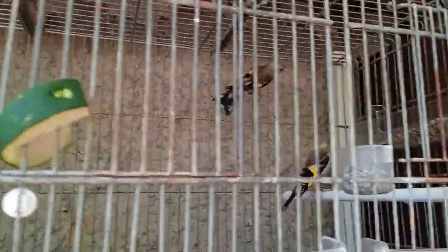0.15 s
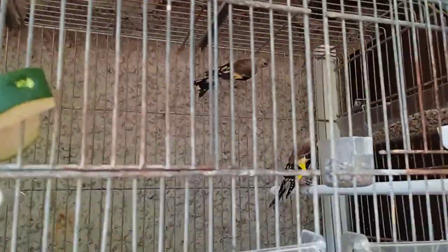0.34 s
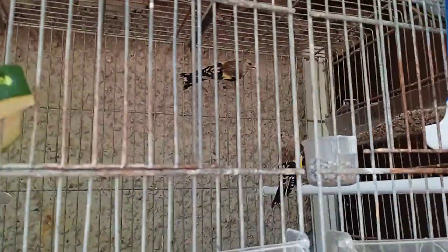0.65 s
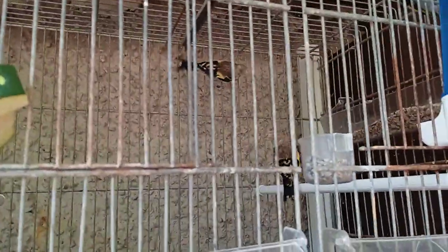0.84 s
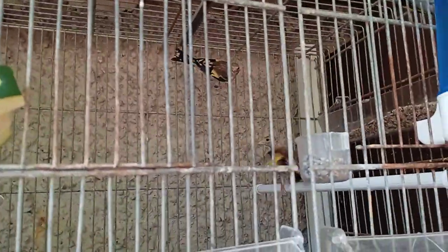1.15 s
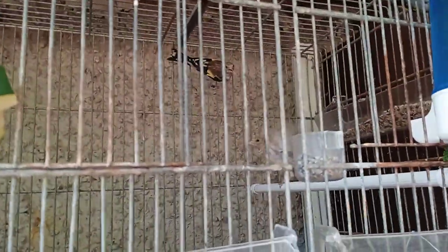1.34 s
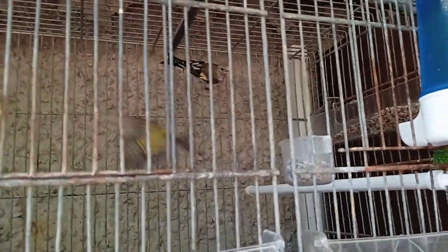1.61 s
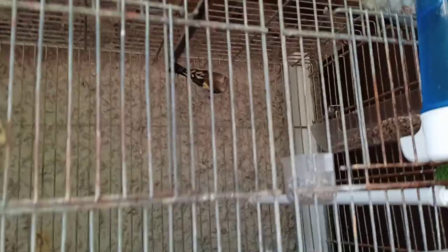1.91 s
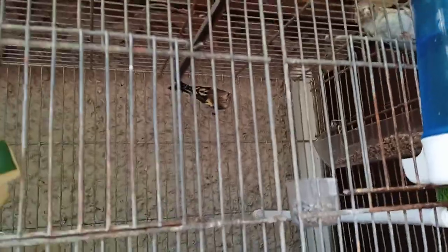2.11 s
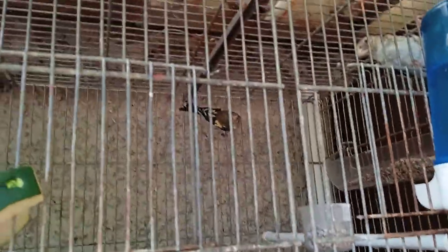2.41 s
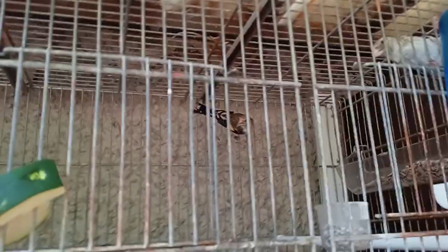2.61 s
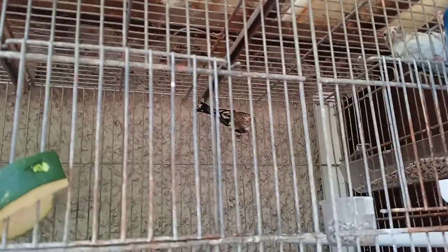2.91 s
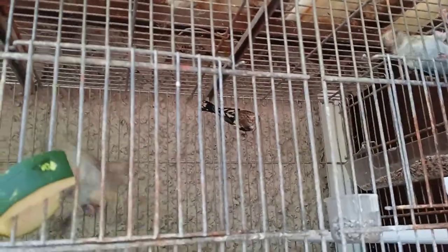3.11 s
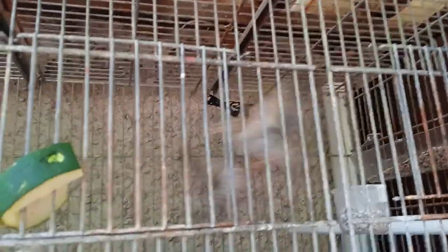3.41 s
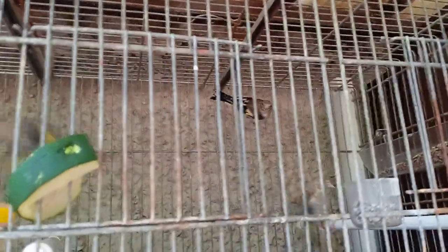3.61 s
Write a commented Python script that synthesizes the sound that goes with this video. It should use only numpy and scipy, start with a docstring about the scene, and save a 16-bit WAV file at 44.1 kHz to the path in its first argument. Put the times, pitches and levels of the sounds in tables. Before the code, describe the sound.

Young goldfinches beg with rising, raspy whistles amid chirps, wing flutters and cage wire ticks.

```python
"""Young goldfinches beg in a wire cage, with rising whines that start raspy and clear to a whistle.
A bird's voice organ (the syrinx) has two sides, so each whine is two voices that mix into extra tones.
Other birds add short chirps, wingbeats push puffs of air, and feet tick and knock on the wires.
The cage stands in a small room with a faint, steady hiss."""
import sys
import numpy as np
from scipy import signal
from scipy.fft import rfft, irfft, next_fast_len
from scipy.io import wavfile

SR = 44100
rng = np.random.default_rng(int(sys.argv[2]) if len(sys.argv) > 2 else 0)


def master(y):
    """Save y as 16-bit WAV."""
    cut = np.clip(np.atleast_2d(y).T, -1, 1)
    pcm = np.round(cut * 32767)  # scale
    wavfile.write(sys.argv[1], SR, pcm.astype(np.int16))


N = 165375

# The tone colours of the noises. Each row: frequency in Hz, relative level in dB.
HISS_COLOUR = [(25,-12.5),(85,3),(300,-12),(1000,-15),(1650,-9.5),(2450,-22),(3200,-7),(4500,-21),(5900,0.5),(7200,-7),(9000,-20),(13300,-40),(15500,-15)]
PUFF_COLOUR = [(35,-23),(85,1),(250,-2.5),(480,-6.5),(1100,-30.5)]
SWISH_COLOUR = [(200,-32),(550,2),(1000,-2.5),(1700,1),(2600,-10.5),(7000,-9.5),(11500,-25)]
TICK_COLOUR = [(100,4),(700,4.5),(1800,6),(2800,-2.5),(7000,-4),(12500,-20.5),(15500,-8)]
RATTLE_COLOUR = [(150,-27),(700,1.5),(1300,-5),(1850,0.5),(2200,-14),(8000,-24.5)]
# How the wing flutter swells and fades. Each row: time in seconds, level in dB.
WING_LEVELS = [(0,-64.5),(.07,-65.5),(.2,-85.5),(.43,-73.5),(.6,-101),(1.598,-78),(1.678,-63.5),(1.92,-69),(2.04,-75.5),(2.236,-61.5),(2.34,-69),(3.15,-74.5),(3.44,-64),(3.485,-58),(3.54,-61),(3.75,-68.5)]
# Feet and wing tips hit the wires. Each row: start in seconds, level in dB, treble tilt in dB per octave.
TICKS = [(0.01,-50,2.5),(0.376,-44,5.5),(1.128,-55,15),(1.67,-53,6),(1.759,-51,0),(1.797,-52.5,0),
         (1.836,-51.5,-1.5),(2.103,-55,-2.5),(2.227,-45.5,2),(2.284,-53,1.5),(3.581,-52.5,4.5)]
# Knocks on the cage. Each row: start in seconds, level in dB.
KNOCKS = [(.043,-53.5),(0.062,-49)]
# The cage's ringing notes. Each row: pitch in Hz, relative level in dB, seconds to fade by 60 dB.
CAGE_NOTES = [(651,-12,0.87),(962,3,0.072),(1414,-10,0.072),(1680,-5,0.072),(1800,-1.5,0.13)]
# Other birds. Each row: start and length in seconds, first, middle and last pitch in Hz, level in dB.
CHIRPS = [(1.318,0.025,4130,4770,4600,-59),(1.348,0.022,4700,5160,5400,-52.5),(1.366,0.029,5630,5840,5300,-62.5),
          (1.58,0.026,4250,4215,4270,-53),(1.587,0.057,2723,2889,2852,-44),(1.611,0.019,3200,3380,3300,-51.5),
          (1.627,0.043,4280,4170,4070,-54.5),(1.685,0.039,4240,4180,3980,-59.5),(1.841,0.24,1995,1922,1900,-69.5),
          (2.02,0.04,7700,7200,7340,-63.5),(2.022,0.048,6800,6460,6200,-60),(2.15,0.037,4640,4840,5170,-60.5),
          (2.748,0.033,4250,4540,4750,-67),(2.777,0.071,4800,5360,5540,-69),(3.087,0.029,2790,3150,3540,-59.5),
          (3.154,0.035,2680,3070,3300,-60.5),(3.6,0.033,3590,3780,4010,-53),(3.635,0.055,2600,2740,2797,-54.5),
          (3.682,0.01,4440,4670,4800,-50.5),(3.704,0.034,4700,5350,5800,-49),(3.712,0.061,3430,3855,4170,-56)]
HUSKY_CHIRPS = [(2.463,0.12,4750,3840,3570,-62.5)]
# The leading voice of each whine.
# Each row: time in seconds, base pitch in Hz, level in dB of the tone an octave above that pitch.
WHINE_1 = [(.185,1628,-55.5),(.21,1772,-47.5),(.235,1996,-44.5),(.3,2131,-44.5),(.375,2170,-48),(.42,2219,-53.5),(.47,2223,-53.5),(.543,2270,-70)]
WHINE_2 = [(.78,2197,-57),(.82,2185,-78),(.9,2470,-55),(.92,2673,-54),(.975,2575,-54.5),(1.01,2405,-68)]
WHINE_3 = [(1.42,1224,-66.5),(1.452,1704,-42.5),(1.49,2116,-45),(1.537,2516,-46),(1.565,2660,-73)]
WHINE_4 = [(2.893,1558,-68.5),(2.925,1862,-45),(2.96,2031,-44.5),(3.03,2139,-45),(3.12,2205,-62.5),(3.255,2260,-61.5)]
WHINE_5 = [(3.28,2157,-58),(3.34,2113,-73),(3.385,2475,-60.5),(3.44,2516,-48.5),(3.495,2467,-54)]
WHINE_6 = [(3.478,1510,-53.5),(3.493,1717,-37.5),(3.513,1943,-35.5),(3.542,2203,-34.5),(3.57,2350,-67),(3.586,2410,-37),(3.61,2504,-51),(3.64,2704,-53)]
# The other side of the voice organ in the same whines, with the same columns.
SECOND_1 = [(0.183,2250,-44),(0.214,2530,-41),(.228,2760,-58.5),(.27,3020,-79)]
SECOND_2 = [(0.773,1618,-59.5),(0.848,1900,-55),(0.906,2138,-57),(0.948,1740,-77)]
SECOND_3 = [(1.419,1702,-51),(1.434,2030,-49),(1.463,2790,-89)]
SECOND_4 = [(2.887,2156,-51.5),(2.915,2526,-42.5),(2.94,2710,-61),(2.991,3000,-69)]
SECOND_5 = [(3.271,1629,-58.5),(3.384,1983,-50.5),(3.452,1885,-61)]
SECOND_6 = [(3.463,1762,-40.5),(3.472,2020,-35),(3.509,2970,-99)]
# The leading and upper voices of the squawks that open two whines, with the same columns.
SQUAWK_1 = [(.697,1342,-91),(.73,2090,-57),(.755,2340,-48),(.775,2297,-54)]
UPPER_1 = [(0.702,2206,-61.5),(0.728,2756,-56),(.74,2940,-64)]
SQUAWK_2 = [(3.2,1464,-80),(3.238,2300,-51),(3.27,2385,-57)]
UPPER_2 = [(3.194,2254,-58),(3.22,2730,-54),(3.235,2970,-62)]
# The begging calls. Each row: leading voice, second voice, roughness of the start from 0 to 1.
BEGGING = [(WHINE_1,SECOND_1,.5),(SQUAWK_1,UPPER_1,.5),(WHINE_2,SECOND_2,.02),(WHINE_3,SECOND_3,1),(WHINE_4,SECOND_4,.4),(SQUAWK_2,UPPER_2,.5),(WHINE_5,SECOND_5,.02),(WHINE_6,SECOND_6,.35)]
# The overtones (higher tones) of a full voice. Each row: frequency in Hz, level in dB.
BEAK_COLOUR = [(2300,-71),(3500,-59),(7000,-59),(8200,-73),(9800,-77.5),(11050,-66.5),(11900,-82.5),(15200,-63)]
# Pitches that close echoes cancel. Each row: frequency in Hz, width in Hz.
NOTCHES = [(3670,49),(4075,15),(4205,7.6),(4420,23)]

HISS_DB, CUT_HZ = -67, 15880
ROOM_DB, ROOM_FADE_S, ECHO_DB, ECHO_S = -14, .23, -5.5, .012
PUFF_DB, SWISH_DB, BEATS_PER_S, BEAT_DB, UNEVEN_DB = 1, .5, 17, 1.5, 4
TICK_RISE_S, TICK_DECAY_S = .004, .013
KNOCK_RISE_S, RATTLE_DB, RATTLE_S = .0007, -6, .066
CHIRP_JITTER, HUSKY_JITTER, CHIRP_OCTAVE_DB = .017, .1, -28.5  # jitter: fast shaking, as a share of pitch
RASP_S, RASP_JITTER, CLEAR_JITTER, JITTER_HZ = .045, .035, .002, 680
EDGE_S, WAVER = .012, .0027  # a voice's fade in and out; its slower pitch wobble
FLUTTER_DB, FLUTTER_HZ, FRAY_DB, FRAY_HZ = 2.3, 60.6, -25, 900  # slow and fast flicker in loudness
FULL_DB, BASE_DB = -33, -54.5  # octave and base tone of a full voice
BASE_FOLLOW, OVERTONE_FOLLOW = .64, .52  # dB gained for each dB the octave gains
PEAK_HZ, PEAK_WIDTH_HZ, PEAK_DB = 1563, 414, 12.5  # a resonance that boosts the base tone
SECOND_BASE_DB, SECOND_ODD_DB = -19.5, -12  # the second voice's weak base tone and odd overtones
SUM_TONE_DB, SUM_STEP_DB, CLEAR_MIXING = 7.5, -5, .13  # the last is the share left after the rasp
AIR_DB, HOARSE_DB = -22, -24.5  # breath all through a call; extra breath in the rasp


def amp(db):
    """Turns decibels into a number to multiply by."""
    return 10 ** (np.asarray(db) / 20)


def unit(x):
    """Scales a signal to an average strength (rms) of 1."""
    return x / np.sqrt(np.mean(x ** 2) + 1e-20)


def add(mix, start, sound):
    """Mixes a sound in at a start time in seconds."""
    part = mix[max(round(start * SR), 0):][:len(sound)]
    part += sound[:len(part)]


def wander(n, hz):
    """A random wobble, mostly slower than hz."""
    size = next_fast_len(max(n, 16384))
    f = np.fft.rfftfreq(size, 1 / SR)
    return unit(irfft(rfft(rng.standard_normal(size)) / (1 + (f / hz) ** 4), size))[:n]


def noise(colour, n, tilt_db=0):
    """Noise of strength 1 with the given tone colour."""
    f = np.fft.rfftfreq(n, 1 / SR) + 1
    hz, db = np.transpose(colour)
    gain = amp(np.interp(np.log(f), np.log(hz), db) + tilt_db * np.log2(f))
    return unit(irfft(rfft(rng.standard_normal(n)) * gain, n))


def tone(phase):
    """A pure tone of strength 1."""
    return np.sqrt(2) * np.sin(phase)


def hiss():
    """A faint, steady background hiss."""
    return amp(HISS_DB) * noise(HISS_COLOUR, N)


def room(x, count=10):
    """Nearby walls add a few quick echoes and a short fading tail."""
    t = np.arange(SR // 2) / SR
    tail = rng.standard_normal(len(t)) * amp(-60 * t / ROOM_FADE_S) * np.minimum(t / ECHO_S, 1)
    response = amp(ROOM_DB) * tail / np.linalg.norm(tail)
    delays = (rng.uniform(.1, 1, count) * ECHO_S * SR).astype(int)
    response[delays] += amp(ECHO_DB) * rng.choice([-1, 1], count) / np.sqrt(count)
    return x + signal.fftconvolve(x, response)[:N]


def wings():
    """Uneven wingbeats push low puffs of air with a swish of feathers."""
    level_db = np.interp(np.arange(N) / SR, *np.transpose(WING_LEVELS))
    rate = BEATS_PER_S * (1 + .211 * wander(N, hz=5.16))
    beats = np.sin(2 * np.pi * np.cumsum(rate) / SR)
    pulse = unit(amp(BEAT_DB * beats + UNEVEN_DB * wander(N, hz=30)))
    air = amp(PUFF_DB) * noise(PUFF_COLOUR, N) + amp(SWISH_DB) * noise(SWISH_COLOUR, N)
    return pulse * amp(level_db) * air


def tick(start, db, tilt_db, size=8192):
    """A foot or wing tip makes a short, grainy scuff on the wires."""
    t = np.arange(size) / SR
    grain = unit(noise(TICK_COLOUR, size, tilt_db) * amp(wander(size, hz=402)))
    return start, amp(db) * grain * np.minimum(t / TICK_RISE_S, 1) * np.exp(-t / TICK_DECAY_S)


def knock(start, db):
    """A soft blow rings the cage and rattles its loose wires."""
    t = np.arange(SR // 2) / SR
    ring = sum(amp(level - 60 * t / fade_s) * np.sin(2 * np.pi * (hz * t + rng.random()))
               for hz, level, fade_s in CAGE_NOTES)
    rattle = amp(RATTLE_DB) * noise(RATTLE_COLOUR, len(t)) * np.exp(-t / RATTLE_S)
    return start, amp(db) * (ring + rattle) * np.minimum(t / KNOCK_RISE_S, 1)


def chirp(start, length, first_hz, middle_hz, last_hz, db, jitter=CHIRP_JITTER):
    """A bird's nearly pure note bends through three pitches."""
    progress = np.linspace(0, 1, int(length * SR))
    hz = np.polyval(np.polyfit([0, .5, 1], [first_hz, middle_hz, last_hz], 2), progress)
    phase = 2 * np.pi * np.cumsum(hz * (1 + jitter * wander(len(hz), JITTER_HZ))) / SR
    swell = abs(np.sin(np.pi * progress)) ** .7
    return start, amp(db) * swell * (tone(phase) + amp(CHIRP_OCTAVE_DB) * tone(2 * phase))


def husky_chirp(*row):
    """A chirp whose pitch shakes so much that it smears."""
    return chirp(*row, jitter=HUSKY_JITTER)


def close_echoes(x):
    """Close echoes cancel some pitches, so a rising call sounds in steps."""
    for hz, width in NOTCHES:
        x = signal.lfilter(*signal.iirnotch(hz, hz / width, SR), x)
    return x


def beak(hz, db):
    """How strongly an overtone at hz comes out when the voice is at level db."""
    full_voice_db = np.interp(hz, *np.transpose(BEAK_COLOUR))
    return amp(full_voice_db + OVERTONE_FOLLOW * (db - FULL_DB)) * (hz < CUT_HZ)


def voice(t, curve, jitter):
    """One side of the voice organ: its shaky phase, smooth pitch, level and on-off fade."""
    times, pitches, levels = np.transpose(curve)
    hz = np.interp(t, times, pitches)
    shaky_hz = hz * (1 + jitter * wander(len(t), JITTER_HZ) + WAVER * wander(len(t), FLUTTER_HZ))
    on = np.clip(np.minimum(t - times[0], times[-1] - t) / EDGE_S + .5, 0, 1)
    return 2 * np.pi * np.cumsum(shaky_hz) / SR, hz, np.interp(t, times, levels), on


def whine(lead, second, roughness):
    """A young goldfinch begs with two voices at once, hoarse at first and then clear."""
    start = min(lead[0][0], second[0][0]) - EDGE_S
    t = np.arange(start, lead[-1][0] + EDGE_S, 1 / SR)
    n = len(t)
    rasp = roughness * np.exp(-((t - start) / RASP_S) ** 2)
    jitter = CLEAR_JITTER + RASP_JITTER * rasp
    lead_phase, lead_hz, lead_db, lead_on = voice(t, lead, jitter)
    second_phase, second_hz, second_db, second_on = voice(t, second, jitter)
    # Each voice has a base tone, a strong octave above it and faint overtones.
    boost_db = PEAK_DB / (1 + ((lead_hz - PEAK_HZ) / PEAK_WIDTH_HZ) ** 2)
    base_gain = lead_on * amp(BASE_DB + BASE_FOLLOW * (lead_db - FULL_DB) + boost_db)
    lead_gain = lead_on * amp(lead_db + FLUTTER_DB * wander(n, FLUTTER_HZ))
    second_gain = second_on * amp(second_db + FLUTTER_DB * wander(n, FLUTTER_HZ))
    fray = 1 + amp(FRAY_DB) * wander(n, FRAY_HZ)
    call = base_gain * tone(lead_phase) + lead_gain * fray * tone(2 * lead_phase)
    call += second_gain * (amp(SECOND_BASE_DB) * tone(second_phase) + tone(2 * second_phase))
    for k in range(3, 10):
        call += lead_on * beak(k * lead_hz, lead_db) * tone(k * lead_phase)
        odd_cut = amp(SECOND_ODD_DB * (k % 2))
        call += second_on * beak(k * second_hz, second_db) * odd_cut * tone(k * second_phase)
    # The voices shake each other, making new tones at the sums of their pitches.
    mixing = lead_on * second_on * (CLEAR_MIXING + (1 - CLEAR_MIXING) * np.sqrt(rasp))
    for i in range(1, 4):
        for j in range(1, 4):
            gain = beak(i * lead_hz + j * second_hz, (lead_db + second_db) / 2)
            gain *= amp(SUM_TONE_DB + SUM_STEP_DB * (i + j - 4.5))
            call += mixing * gain * tone(i * lead_phase + j * second_phase)
    air = amp(HOARSE_DB) * roughness * np.sqrt(rasp) + amp(AIR_DB)
    breath = air * (lead_gain + second_gain) * noise(BEAK_COLOUR, N)[:n]
    return start, close_echoes(call + breath)


def scene():
    """Birds and cage echo in the room; wings and hiss are added on top."""
    mix = np.zeros(N)
    for source, table in ((whine, BEGGING), (chirp, CHIRPS), (husky_chirp, HUSKY_CHIRPS),
                          (tick, TICKS), (knock, KNOCKS)):
        for row in table:
            add(mix, *source(*row))
    return (room(mix) + wings() + hiss())[None]


def record(dry):
    """The microphone loses the deepest bass, and the highest treble is cut off."""
    bass_cut = signal.butter(2, 55, "high", fs=SR, output="sos")
    treble_cut = signal.firwin(801, CUT_HZ, window=("kaiser", 9), fs=SR)
    return signal.oaconvolve(signal.sosfilt(bass_cut, dry), treble_cut[None], "same")


dry = scene()
out = record(dry)
master(out)
```